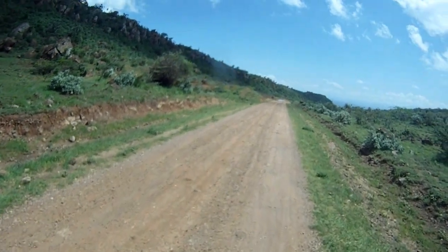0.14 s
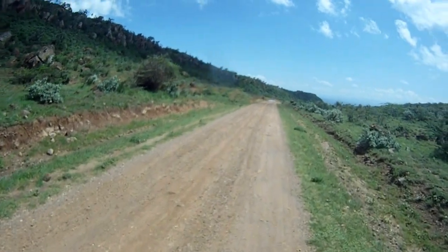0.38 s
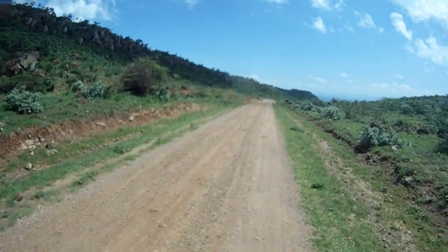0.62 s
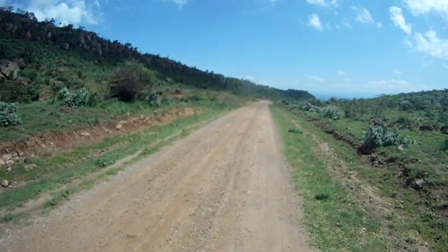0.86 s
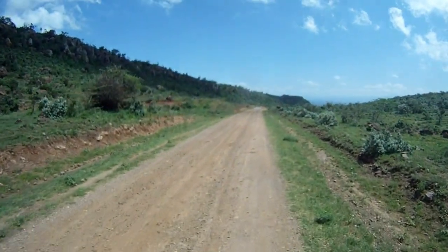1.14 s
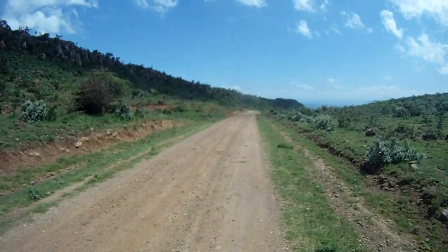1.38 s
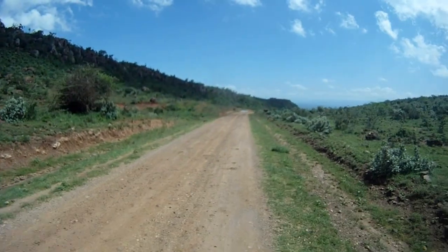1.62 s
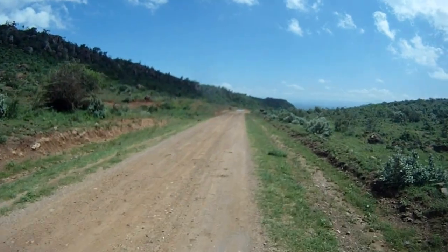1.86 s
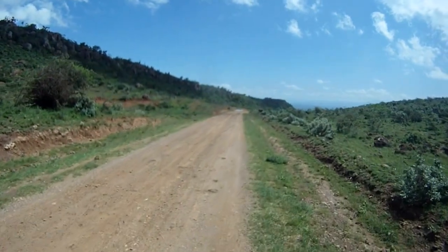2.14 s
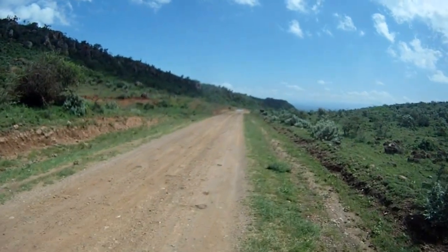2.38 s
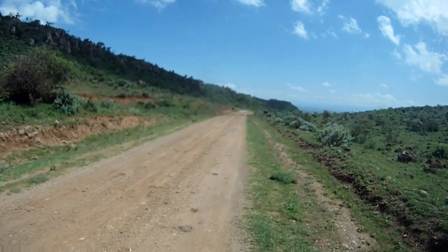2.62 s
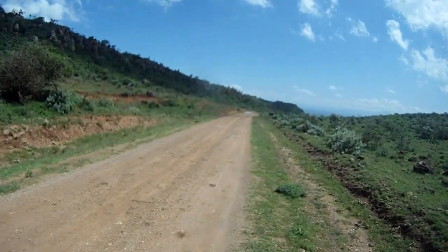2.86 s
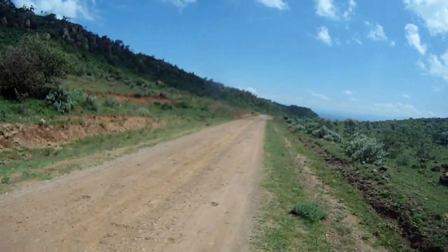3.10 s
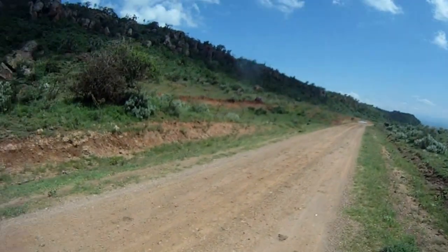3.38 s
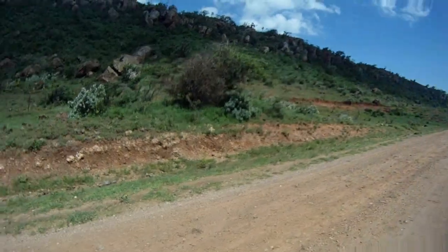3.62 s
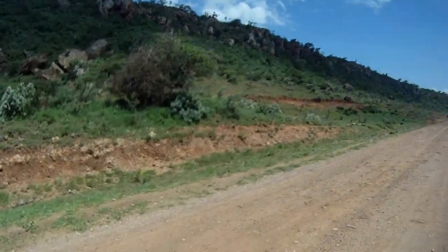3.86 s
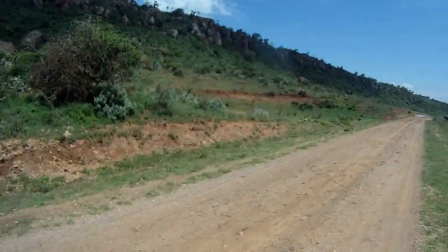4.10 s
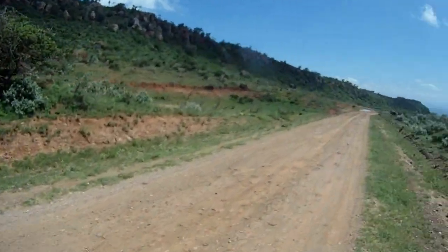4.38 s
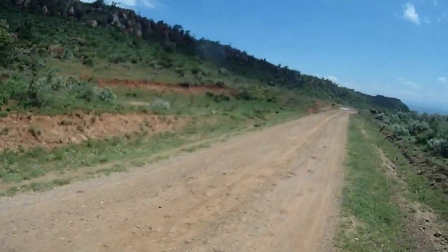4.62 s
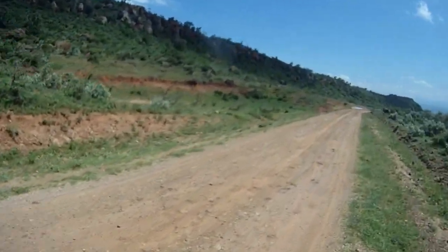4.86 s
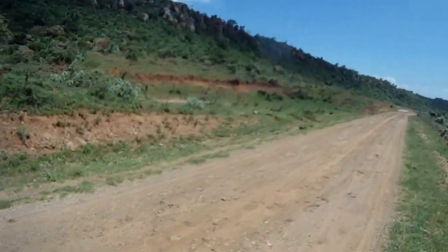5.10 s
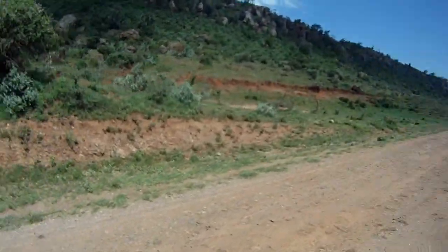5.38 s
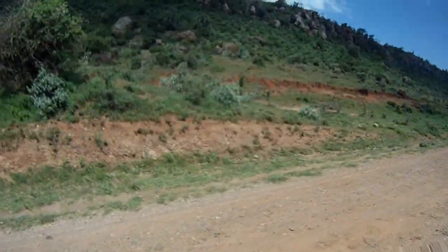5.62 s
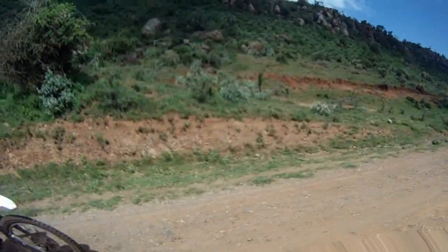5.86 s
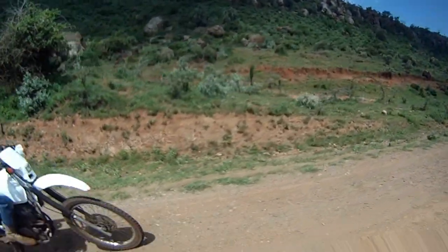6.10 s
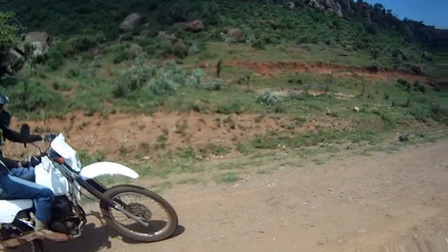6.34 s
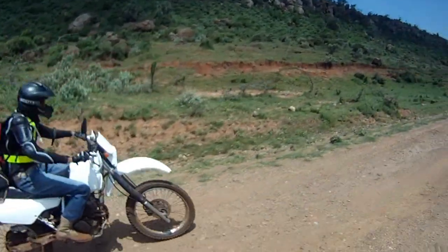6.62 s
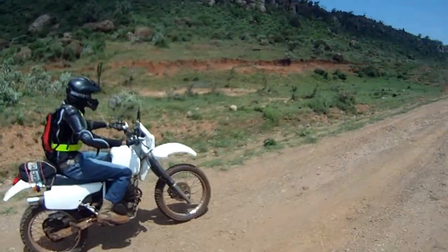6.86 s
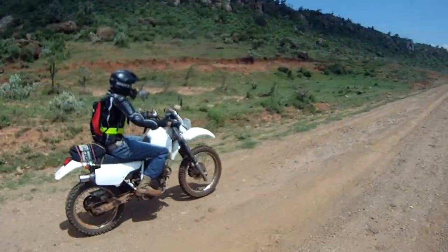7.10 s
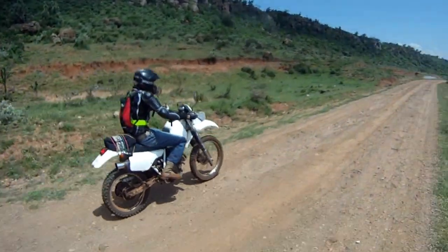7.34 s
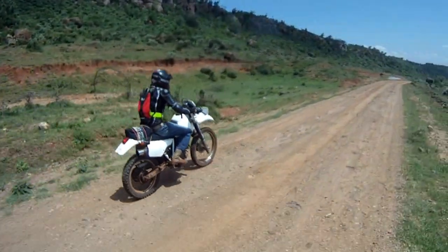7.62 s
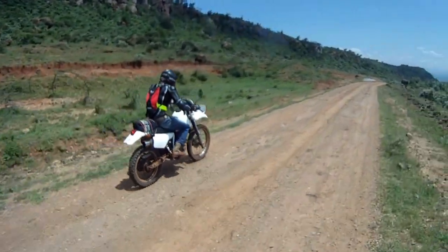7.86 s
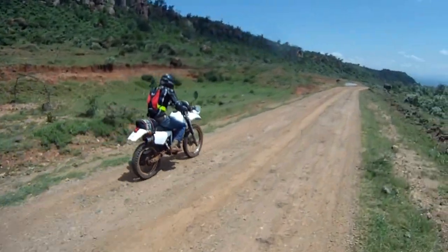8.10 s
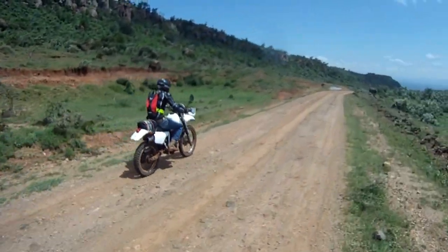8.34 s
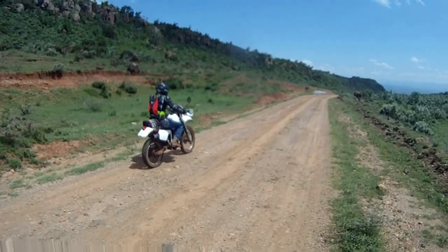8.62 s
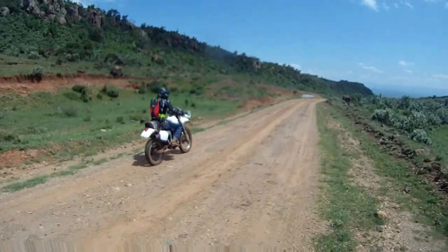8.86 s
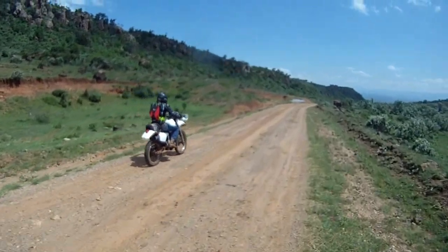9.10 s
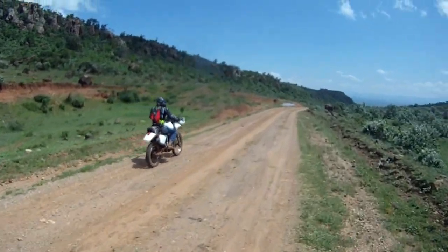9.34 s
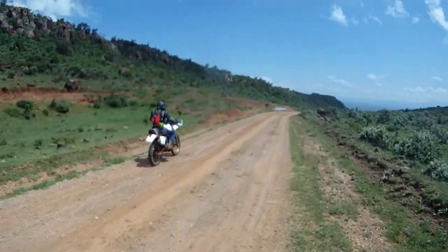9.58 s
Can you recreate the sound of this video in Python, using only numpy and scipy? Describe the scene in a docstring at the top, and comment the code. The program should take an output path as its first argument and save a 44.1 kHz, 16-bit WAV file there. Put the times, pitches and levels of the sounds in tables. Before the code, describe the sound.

Heard from a moving rider's helmet on an open gravel track: a single-cylinder trail bike chugs low and steady. A second similar engine joins after one second, grows nearer, coasts with a hollow boom and ticking, then opens its throttle near eight seconds and pulls ahead. Wind rumbles throughout, with hard gust thumps overloading the microphone. Sound is muffled, with gritty low-quality treble.

```python
"""On a gravel track, heard from a rider's helmet: a single-cylinder trail bike carries the listener while
a second bike draws level, coasts alongside and pulls ahead under throttle. Each engine is a train of
firing pulses that excites resonances of its pipe and metal. Wind, gravel and whirr are shaped noise;
single low thumps, nearly all of them gusts on the microphone, are brief pressure swings. A low-rate
converter mirrors the muffled sound into the treble."""
import sys
import numpy as np
from scipy import signal
from scipy.io import wavfile
from scipy.ndimage import uniform_filter1d

SR = 44100
rng = np.random.default_rng(int(sys.argv[2]) if len(sys.argv) > 2 else 0)


def volts_from_db(level):
    """Convert decibel levels to linear amplitude ratios."""
    exponent = np.asarray(level, float) / 20
    return 10 ** exponent


def wav_out(sig):
    """Save sig, one row per channel (or a flat mono array), as 16-bit PCM at SR to the path in sys.argv[1]."""
    wavfile.write(sys.argv[1], SR, np.round(np.clip(np.atleast_2d(sig).T, -1, 1) * 32767).astype(np.int16))


N = 428649

# Wind and ground noise. Each row: time in seconds, wind level in dB, gravel and chain level in dB.
RIDE = [(0, -27, -49.5), (.6, -27.5, -49.5), (1.05, -29.5, -49.5), (1.16, -21, -45), (1.5, -22, -44.5),
        (1.9, -25.5, -48.5), (3.45, -23.5, -49.5), (3.6, -17.5, -52.5), (4, -23, -49), (4.35, -27, -47.5),
        (5, -23.5, -45.5), (5.5, -20.5, -45.5), (6.25, -19.5, -45), (6.6, -16.5, -44.5),
        (7.05, -26.5, -47.5), (8, -16, -44), (8.5, -20.5, -45), (9.5, -26.5, -47.5), (9.72, -48, -50.5)]
# Spectrum of the wind. Each row: frequency in Hz, relative density in dB per Hz.
WIND = [(15, 10), (45, -6.5), (100, 1.5), (200, -11), (320, -13), (550, -16), (750, -28), (1000, -51)]
# Spectrum of tyres and chain on gravel. Each row: frequency in Hz, relative density in dB per Hz.
GRAVEL = [(700, -10), (900, -2), (1500, -8), (2200, -6.5), (3400, -9.5), (4500, -16), (5600, -15),
          (6000, -0.5)]
# Bands of the running gear: two broad whirrs, then two thin whines. Each row: centre in Hz, width in Hz.
WHIRR_BANDS = [(2616, 870), (4080, 1600), (1556, 94), (2845, 94)]
# The two thin whines. Each row: time in seconds, level of the low one in dB, level of the high one in dB.
WHINES = [(0, -62, -66), (1.3, -59.5, -64), (3, -55, -58), (3.45, -57.5, -50), (3.7, -55, -74),
          (4.5, -56, -52), (5.3, -56, -57), (5.7, -59, -60), (7, -58, -54), (8.1, -51.5, -93),
          (8.6, -56, -78), (9.72, -69, -58)]
# Single low thumps: gusts on the microphone, and at 6.828 s one exhaust pulse of the passing bike.
# Each row: time in seconds, peak level in dB, pitch in Hz.
LOW_THUMPS = [(1.148, -12, 60), (3.635, -8.5, 70), (3.737, -5, 50), (5.548, -4.5, 72), (5.672, -4, 76),
              (6.305, -0.5, 97), (6.608, -33, 97), (6.828, -24, 111), (7.989, -43, 60), (8.377, -1.5, 74)]

# Engine speed of the carrying bike. Each row: time in seconds, firings per second.
OWN_SPEED = [(0.0, 23.964), (0.25, 24.68), (0.38, 22.357), (0.5, 21.47), (0.88, 26.555), (1.25, 29.675),
             (1.38, 29.918), (1.62, 27.584), (1.88, 20.107), (2.0, 18.767), (2.62, 21.35), (3.0, 20.243),
             (4.68, 21.846), (5.52, 22.959), (5.94, 23.2), (6.78, 24.231), (8.04, 26.194), (9.3, 27.921),
             (9.72, 30.183)]
# Load on the carrying bike. Each row: time in seconds, exhaust level in dB.
OWN_LOAD = [(0, -16.5), (.5, -15.5), (.88, -17), (1.05, -20), (1.43, -17.5), (1.5, -26), (2.6, -23),
            (3.5, -21.5), (3.75, -24.5), (4, -21.5), (5.2, -22), (6, -26.5), (6.6, -29.5), (7, -24),
            (7.5, -22.5), (8, -23), (8.6, -26.5), (9.72, -32.5)]
# Lower exhaust modes of the carrying bike. Each row: centre in Hz, width in Hz, relative level in dB, polarity.
OWN_PIPE = [(53.7, 44, -8, -1), (131.4, 56, -2, -1), (300, 80.4, 1, 1)]
# Its upper pipe modes. Each row: centre in Hz, width in Hz, relative level in dB, polarity.
OWN_RASP = [(440.6, 42, -8, 1), (533.5, 86, -8, -1), (696.6, 76, -23, 1)]
# The upper pipe modes sag once the bike pulls. Each row: time in seconds, tuning factor.
RASP_TUNING = [(.85, 1.07), (1.2, 1.0)]
# Ringing of cylinder head and covers. Each row: centre in Hz, width in Hz, relative level in dB, polarity.
HEAD = [(1370, 1700, -5.5, 1), (2615, 1700, 2, -1), (4680, 6300, -12.5, 1)]

# Engine speed of the passing bike. Each row: time in seconds, firings per second.
OTHER_SPEED = [(1.0, 27.418), (1.38, 30.57), (1.5, 32.382), (1.75, 31.766), (2.48, 31.534), (2.85, 29.467),
               (3.21, 29.949), (3.58, 28.654), (5.77, 23.991), (6.65, 22.353), (6.95, 23.481),
               (7.1, 22.915), (7.4, 18.928), (7.7, 18.846), (8.15, 25.972), (8.45, 26.97), (8.75, 26.778),
               (8.9, 26.022), (9.8, 28.356)]
# The passing bike. Each row: time in seconds, nearness in dB, throttle from 0 (shut) to 1 (full).
OTHER_LOAD = [(1, -27, 0.7), (1.3, -17, 1), (1.5, -13.5, 0.79), (2.6, -12.5, 0), (3.5, -6.5, 0.27),
              (4.3, -5, 0.17), (5.1, -1, 0.49), (5.6, -2.5, 0.13), (6.1, -4.5, 0), (6.7, -5, 0.35),
              (7.2, -4, 0), (7.7, -4.5, .4), (8.1, -1.5, 0.15), (8.4, -1, 0.8), (8.7, -5.5, 0.98),
              (9.72, -6.5, 0.99)]
# Its exhaust modes with the throttle shut. Each row: centre in Hz, width in Hz, relative level in dB, polarity.
BOOM = [(91.6, 52.7, -1, -1), (163, 41, -19, 1), (305, 120, -21.5, -1)]
# Its exhaust modes under throttle. Each row: centre in Hz, width in Hz, relative level in dB, polarity.
THUMP = [(121, 57, 4.5, -1), (201, 185, -3.5, 1), (728, 153, -27, -1)]
# The bark of its pipe. Each row: centre in Hz, width in Hz, relative level in dB, polarity.
BARK = [(141.4, 53, 3, -1), (289, 200, -7, 1), (406, 140, -14, 1), (507.3, 103, -7.5, -1)]
# Each row: time in seconds, bark level in dB, lead of the bark on the firing phase in ms.
BARK_LEVEL = [(1, -61, 6.5), (1.3, -25.5, 2), (2.5, -22, 2), (2.9, -33, -5), (4.6, -27, -4.5),
              (5.6, -29.5, -5), (6.3, -24, 11), (7, -20, 10.5), (7.3, -24.5, 12), (7.7, -23, 2),
              (8.7, -30, 2), (9.72, -30.5, 3.5)]
# Its valve ticks. Each row: centre in Hz, width in Hz, relative level in dB, polarity.
TICK = [(1090, 930, 2, 1), (2666, 850, 5.5, -1)]
# Ticks are loudest while the engine's side faces the helmet. Each row: time in seconds, level in dB.
TICK_LEVEL = [(1, -65), (1.5, -56.5), (2.3, -61.5), (3.4, -53.5), (3.7, -53.5), (4.6, -49.5), (5.1, -45),
              (6.1, -48), (6.7, -45.5), (7.22, -43), (7.35, -50.5), (8.1, -48), (8.6, -49), (9.2, -47.5),
              (9.72, -49)]
# High ring of its valve cover. Each row: centre in Hz, width in Hz, relative level in dB, polarity.
COVER = [(4530, 1080, 0, 1)]
# The ring is heard while the helmet faces the cover. Each row: time in seconds, level in dB.
COVER_LEVEL = [(1, -65), (3.4, -59), (3.7, -65), (4.2, -57), (5, -50.5), (5.9, -54.5), (6.3, -64),
               (8.4, -64.5), (9.72, -60)]

OWN_START, OTHER_START = .738, .513  # phase of the firing cycle at time zero, in cycles
RASP_KNEE_HZ, RASP_DB_PER_HZ = 27.65, 2.5  # the upper pipe modes speak up at high revs
TUNED_HZ, TUNING_PER_HZ = 24.43, 0.0085  # faster firing heats the pipe and lifts its tuning
CRACK_DB, CRACK_SLOPE, FULL_DB = -45.5, 2.67, -16.5  # the crack of the exhaust edge fades faster than the body
BOOM_DB, BOOM_OPEN_DB = -17., -4.5  # level with the throttle shut, before nearness; change at full throttle
THUMP_DB, THUMP_OPEN_DB = -39, 29  # the same two for the thump of the exhaust
LOWER_WHIRR_DB, UPPER_WHIRR_DB = -2.5, 1  # relative to the ticks and to the cover's ring
SHADOW_HZ = 3515  # the helmet's edge leaves a dark band in the treble
CONVERTER_HZ = 12000


def evened(x):
    """Normalisation: scales a signal to unit rms."""
    return x / np.sqrt(np.mean(x ** 2) + 1e-20)


def columns(rows):
    """Linear interpolation: each column of a table becomes a curve over all samples."""
    s, *values = np.transpose(rows)
    return [np.interp(np.arange(N) / SR, s, v) for v in values]


def resonate(x, hz, width):
    """Damped resonance: a double pole gives a ring that swells, then dies."""
    r = np.exp(-np.pi * width / SR)
    gain = [(1 - r) ** 2]
    if np.ndim(hz) == 0:
        pole = r * np.exp(2j * np.pi * hz / SR)
        return 2 * signal.lfilter(gain, [1, -2 * pole, pole ** 2], x).real
    # a moving centre is shifted down to zero, smoothed twice and shifted back
    turn = np.exp(2j * np.pi * np.cumsum(hz) / SR)
    smoothed = signal.lfilter(gain, [1, -2 * r, r * r], x * turn.conj())
    return 2 * (turn * smoothed).real


def pipe(x, modes, tuning=1):
    """Modal superposition: the response is the signed sum of a set of resonances."""
    return sum(np.sign(side) * volts_from_db(db) * resonate(x, hz * tuning, w) for hz, w, db, side in modes)


def firings(speed, start, lead_s, uneven_db, jitter_s):
    """Pulse train: one click a firing, even in energy per second, a little uneven in size and time."""
    rate, = columns(speed)
    cycles = start + np.cumsum(rate) / SR + lead_s * rate
    at = np.flatnonzero(np.diff(np.floor(cycles)))
    chance = rng.standard_normal((len(at), 2))
    jitter = np.round(jitter_s * SR * chance[:, 0]).astype(int)
    clicks = np.zeros(N)
    clicks[np.clip(at + jitter, 0, N - 1)] = volts_from_db(uneven_db * chance[:, 1]) / np.sqrt(rate[at])
    return evened(clicks)


def puffs(clicks, delay_s, length_s):
    """Turbulence: every click releases a burst of noise that swells and decays."""
    t = np.arange(2000) / SR
    shape = np.maximum(t - delay_s, 0) * np.exp(-(t - delay_s) / length_s)
    return evened(signal.oaconvolve(clicks, shape)[:N] * rng.standard_normal(N))


def noise(spectrum, size, patchy_db, flicker_db):
    """Coloured noise: random short-time spectra with drifting patches and a flicker shared by all pitches."""
    frames, hz = 4 * N // size + 5, np.fft.rfftfreq(size, 1 / SR)
    a, b, patches = rng.standard_normal((frames, len(hz), 3)).T
    patches = uniform_filter1d(uniform_filter1d(patches, size=6, axis=0), size=5, axis=1)
    flicker = evened(uniform_filter1d(rng.standard_normal(frames), size=3))
    f, db = np.transpose(spectrum)
    colour_db = np.interp(np.log(hz + 1), np.log(f), db, left=-90, right=-90)[:, None]
    z = (a + 1j * b) * volts_from_db(colour_db + patchy_db * evened(patches) + flicker_db * flicker)
    return evened(signal.istft(z, nperseg=size, noverlap=3 * size // 4)[1][:N])


def wind():
    """Flow noise: turbulent pressure on the microphone, strongest at low frequencies and lumpy in level."""
    wind_db, _ = columns(RIDE)
    return volts_from_db(wind_db) * noise(WIND, size=2048, patchy_db=-0.5, flicker_db=2.0)


def gravel():
    """Random impacts: tyres and chain on gravel as patchy noise, loose parts as knocks that ring in metal."""
    _, gravel_db = columns(RIDE)
    # about 70 knocks a second, of widely scattered strength
    knocks = volts_from_db(12.0 * np.minimum(rng.exponential(1, N), 4)) * (rng.random(N) < 70 / SR)
    rattle = evened(pipe(puffs(knocks, 0, .0008), HEAD))
    ground = noise(GRAVEL, size=256, patchy_db=2.5, flicker_db=2.5)
    return volts_from_db(gravel_db) * (ground + 0.13 * rattle)


def whirr():
    """Narrow-band noise: the running gear as one hiss passed through four resonances."""
    hiss = rng.standard_normal(N)
    lower_db = LOWER_WHIRR_DB + columns(TICK_LEVEL)[0]
    upper_db = UPPER_WHIRR_DB + columns(COVER_LEVEL)[0]
    levels = [lower_db, upper_db, *columns(WHINES)]
    return sum(volts_from_db(db) * evened(resonate(hiss, *band)) for db, band in zip(levels, WHIRR_BANDS))


def low_thumps():
    """Pressure transients: each is a negative cosine peak under a Gaussian, flanked by weaker swings."""
    out = np.zeros(N)
    t = np.arange(-900, 900) / SR
    for s, db, hz in LOW_THUMPS:
        swing = np.cos(2 * np.pi * hz * t) * np.exp(-(2.2 * hz * t) ** 2)
        out[round(s * SR) - 900:][:len(t)] -= volts_from_db(db) * swing
    return out


def own_bike():
    """Pulsed excitation: exhaust pulses with a little turbulence ring the pipe, a bright crack at their edge."""
    (level_db,), (rate,) = columns(OWN_LOAD), columns(OWN_SPEED)
    rasp_db = RASP_DB_PER_HZ * np.maximum(rate - RASP_KNEE_HZ, 0)
    tuning = 1 + TUNING_PER_HZ * (rate - TUNED_HZ)
    crack_db = CRACK_DB + CRACK_SLOPE * (level_db - FULL_DB)
    clicks = firings(OWN_SPEED, OWN_START, lead_s=.0015, uneven_db=.8, jitter_s=.00006)
    turbulent = clicks + .12 * puffs(clicks, .0013, .006)
    gas = signal.oaconvolve(turbulent, np.hanning(50), "same")  # rounds the pulses
    body = pipe(gas, OWN_PIPE, tuning)
    rasp = volts_from_db(rasp_db) * pipe(gas, OWN_RASP, *columns(RASP_TUNING))
    exhaust = (body + rasp) / body.std()
    crack = evened(pipe(puffs(clicks, 0.0013, 0.002), HEAD))
    return volts_from_db(level_db) * exhaust + volts_from_db(crack_db) * crack


def other_bike():
    """Load-dependent radiation: boom while coasting, thump under throttle, with bark, ticks and cover ring."""
    near_db, throttle = columns(OTHER_LOAD)
    bark_db, ahead_ms = columns(BARK_LEVEL)
    (tick_db,), (cover_db,) = columns(TICK_LEVEL), columns(COVER_LEVEL)
    clicks = firings(OTHER_SPEED, OTHER_START, lead_s=.0015, uneven_db=1.2, jitter_s=.00012)
    barks = firings(OTHER_SPEED, OTHER_START, lead_s=ahead_ms / 1000, uneven_db=1.2, jitter_s=.00012)
    gas, bark_gas = (c + .13 * puffs(c, .002, .008) for c in (clicks, barks))
    boom = volts_from_db(BOOM_DB + BOOM_OPEN_DB * throttle) * evened(pipe(gas, BOOM))
    thump = volts_from_db(THUMP_DB + THUMP_OPEN_DB * throttle) * evened(pipe(gas, THUMP))
    bark = volts_from_db(bark_db) * evened(pipe(bark_gas, BARK))
    # the valves strike 3.6 ms after the firing click
    valves = np.roll(clicks, round(0.0036 * SR)) + puffs(clicks, 0.0039, 0.002)
    ticks = volts_from_db(tick_db) * evened(pipe(valves, TICK))
    cover = volts_from_db(cover_db) * evened(pipe(valves, COVER))
    return volts_from_db(near_db) * (boom + thump) + bark + ticks + cover


def scene():
    """Superposition: riding noise and both engines, heard past the helmet's edge, with low thumps added."""
    air = wind() + gravel() + whirr() + own_bike() + other_bike()
    shadowed = air - 0.37 * resonate(air, SHADOW_HZ, 410)
    return (shadowed + low_thumps())[None]


def gain_control(x):
    """Compression: loud passages pull the level down, and it recovers after them."""
    power_db = 10 * np.log10(abs(uniform_filter1d(x ** 2, size=300)) + 1e-12)
    recovery = np.arange(N) * 90. / SR  # the held peak falls by 90 dB per second
    peak_db = np.maximum.accumulate(power_db + recovery) - recovery
    over_db = np.maximum(peak_db + 14, 0)  # excess above -14 dB
    return x / volts_from_db(signal.lfilter([.004], [1, -.995], over_db))  # smoothed; 0.8 dB of cut per dB of excess


def low_rate_converter(x):
    """Sample-and-hold imaging: each slow sample is held, which mirrors the sound upward about 6 kHz."""
    smooth = signal.oaconvolve(x, signal.firwin(101, 5500, fs=SR), "same")
    slow = signal.resample_poly(smooth, up=CONVERTER_HZ // 300, down=SR // 300)
    held = signal.resample_poly(np.repeat(slow, 4), up=147, down=160)[:N]  # 48 kHz back to SR
    return np.pad(held, (0, N - len(held)))


def top_cut(x):
    """Nothing passes above the cut-off."""
    return signal.sosfilt(signal.butter(12, 16100, fs=SR, output="sos"), x)


def record(dry):
    """Signal chain: gain control, soft saturation, a 36 Hz high-pass and the low-rate converter."""
    ducked = gain_control(dry[0])
    saturated = 1.154 * np.tanh(ducked / 0.9)
    high_pass = signal.butter(2, 36, "high", fs=SR, output="sos")
    mix = low_rate_converter(signal.sosfilt(high_pass, saturated))
    return top_cut(mix[None])


dry = scene()
out = record(dry)
wav_out(out)
```